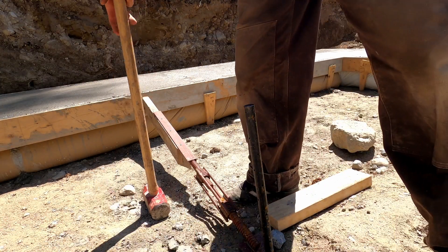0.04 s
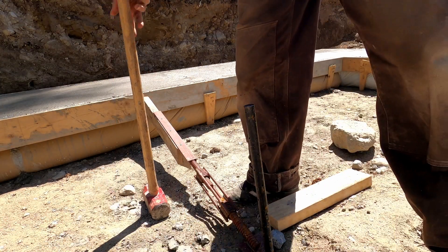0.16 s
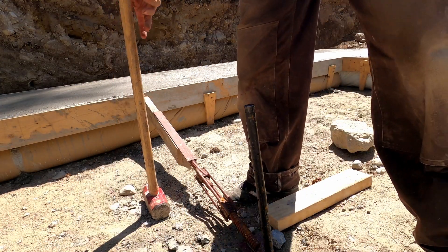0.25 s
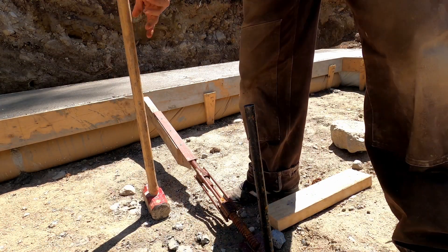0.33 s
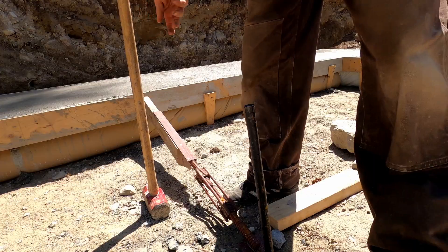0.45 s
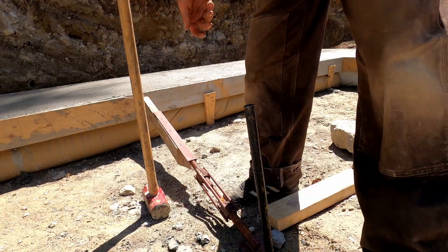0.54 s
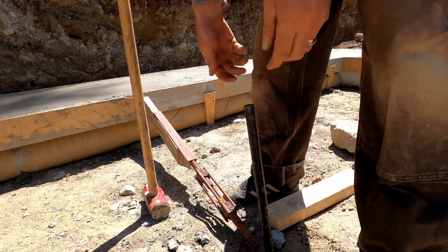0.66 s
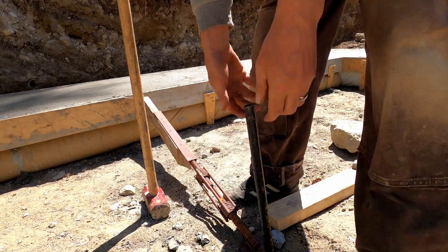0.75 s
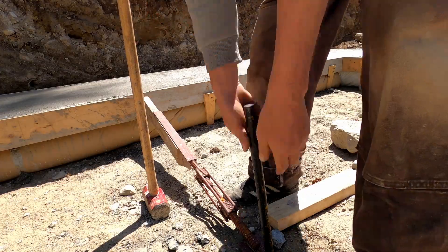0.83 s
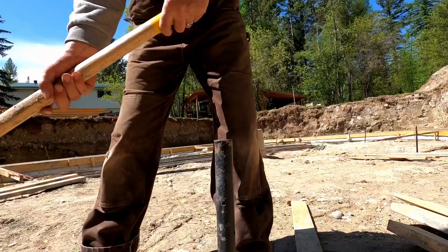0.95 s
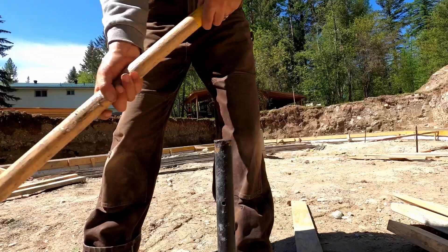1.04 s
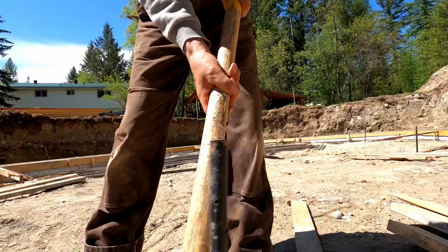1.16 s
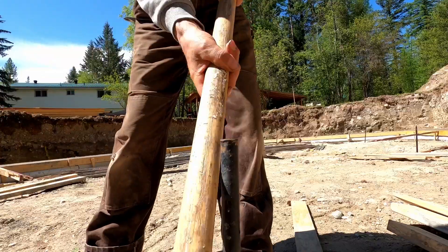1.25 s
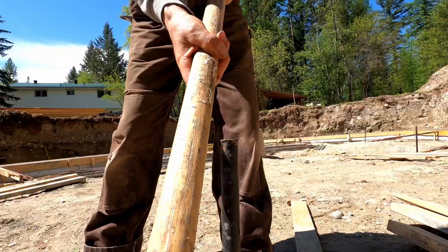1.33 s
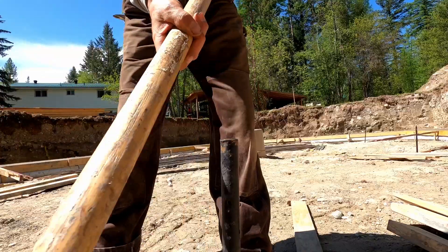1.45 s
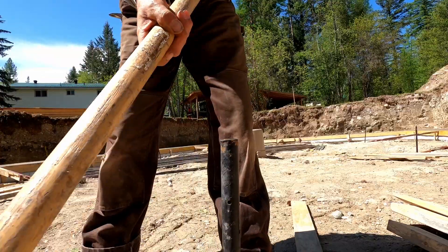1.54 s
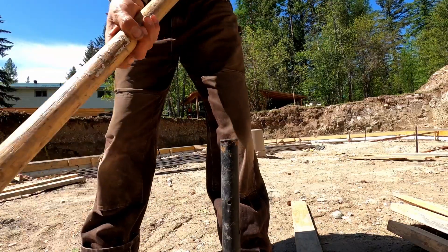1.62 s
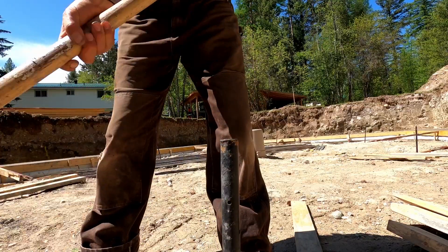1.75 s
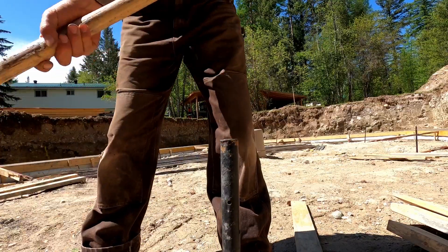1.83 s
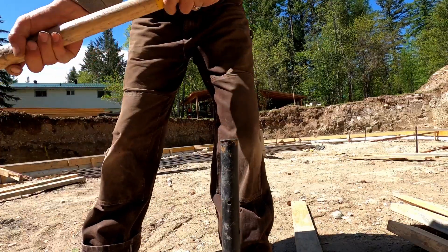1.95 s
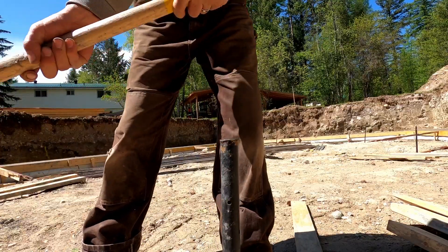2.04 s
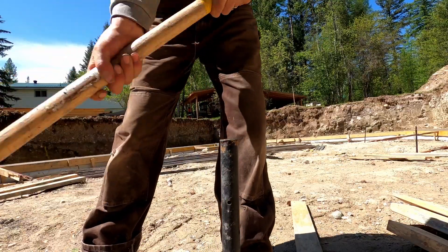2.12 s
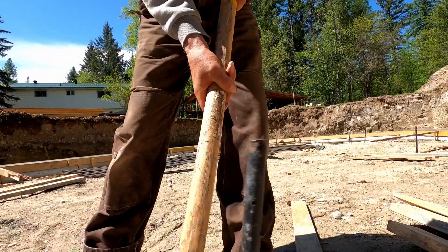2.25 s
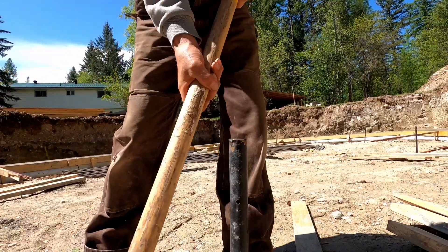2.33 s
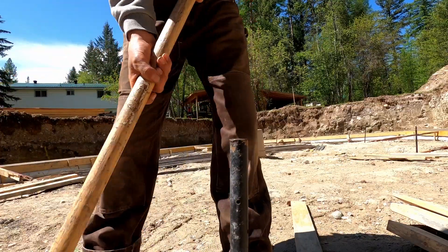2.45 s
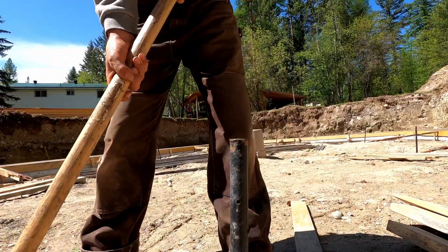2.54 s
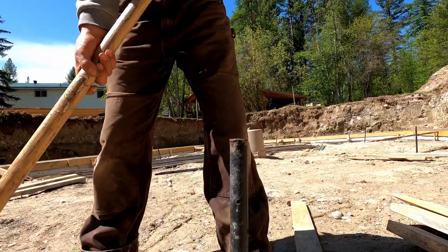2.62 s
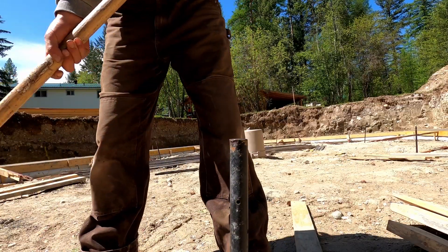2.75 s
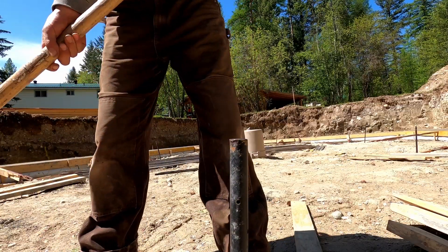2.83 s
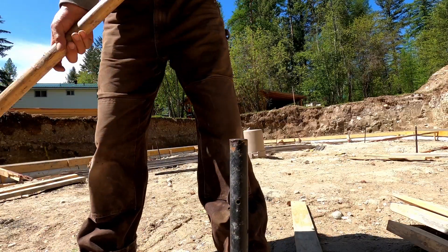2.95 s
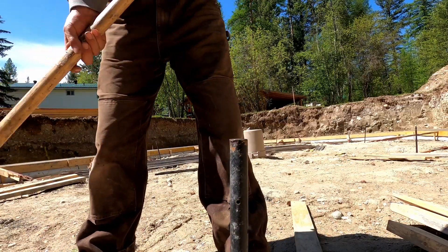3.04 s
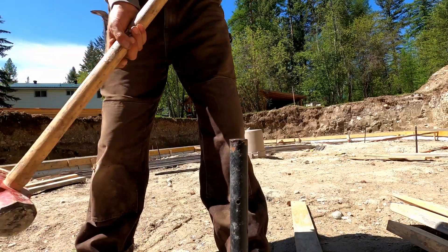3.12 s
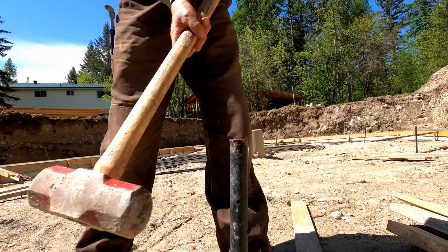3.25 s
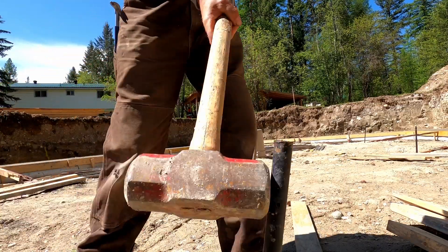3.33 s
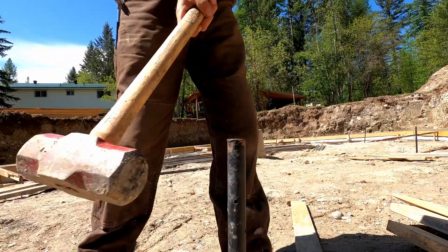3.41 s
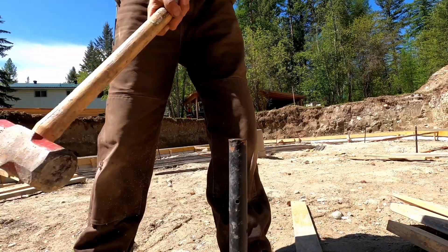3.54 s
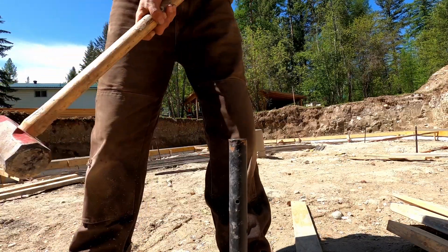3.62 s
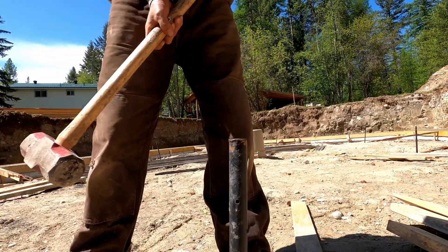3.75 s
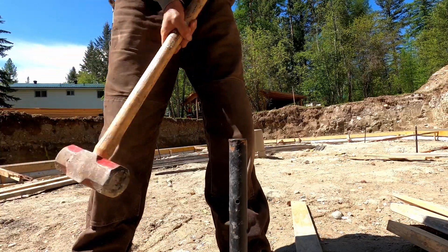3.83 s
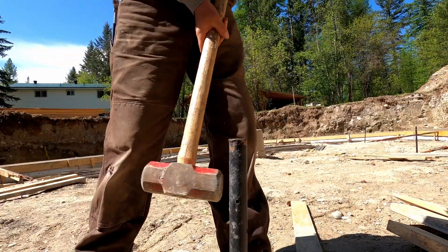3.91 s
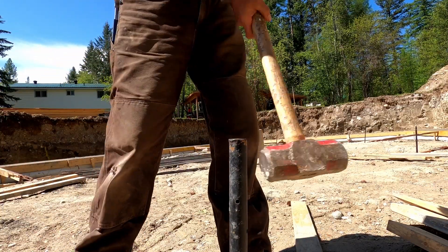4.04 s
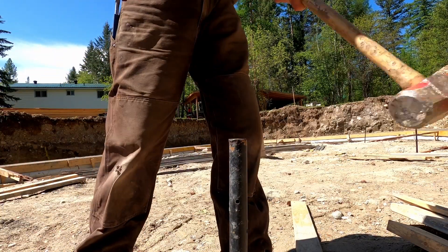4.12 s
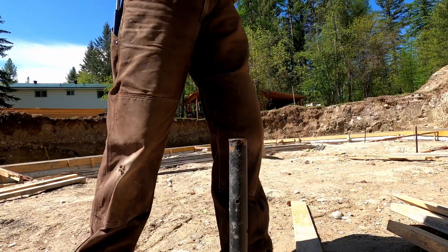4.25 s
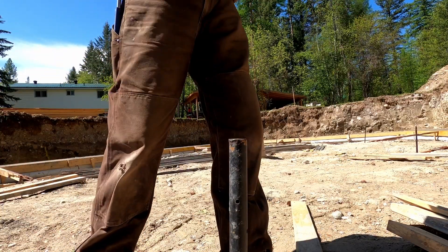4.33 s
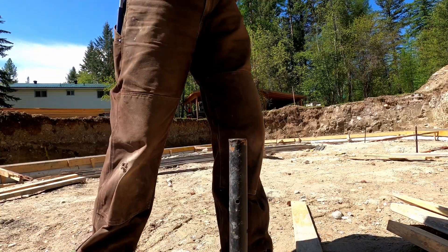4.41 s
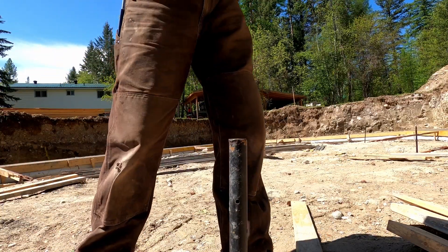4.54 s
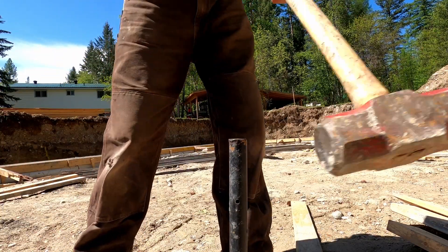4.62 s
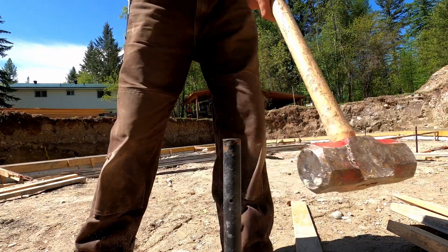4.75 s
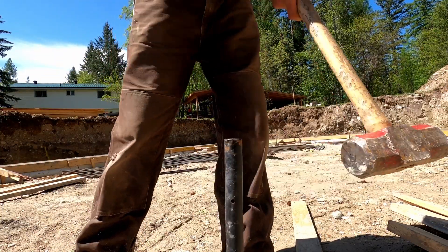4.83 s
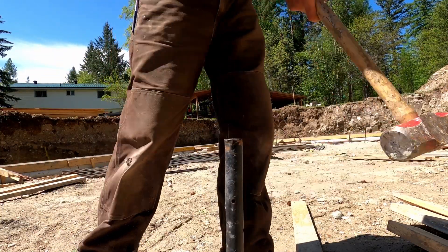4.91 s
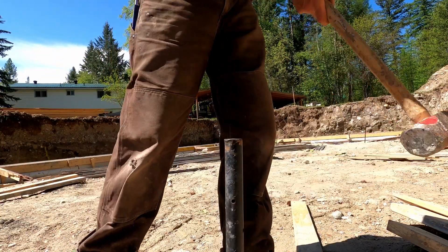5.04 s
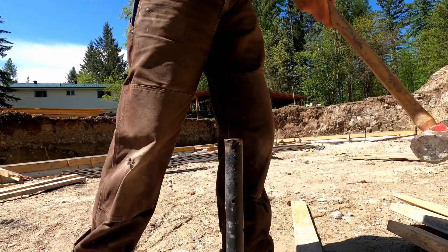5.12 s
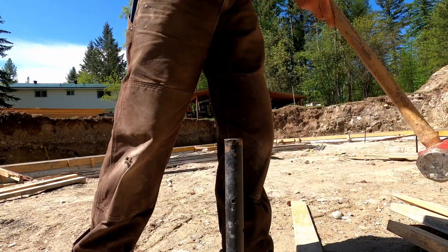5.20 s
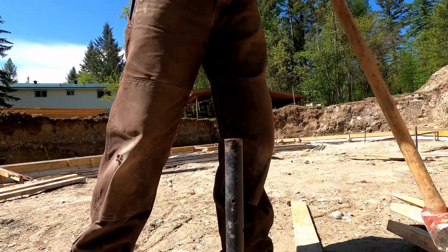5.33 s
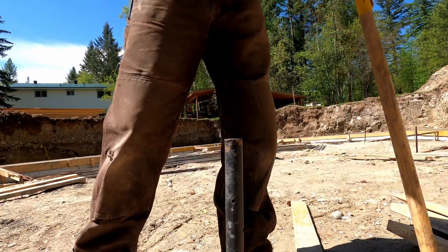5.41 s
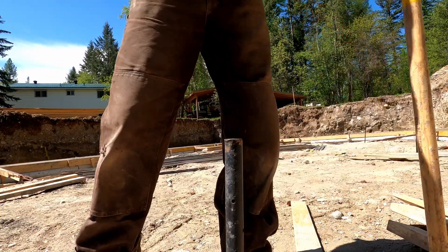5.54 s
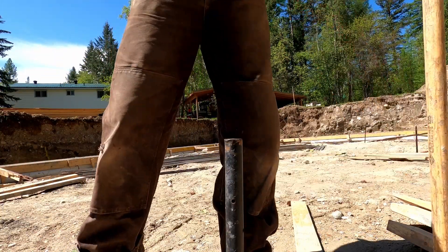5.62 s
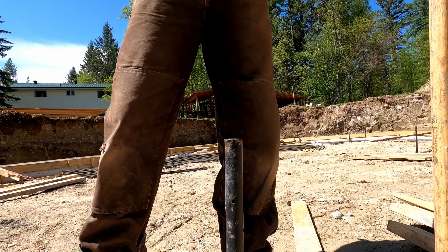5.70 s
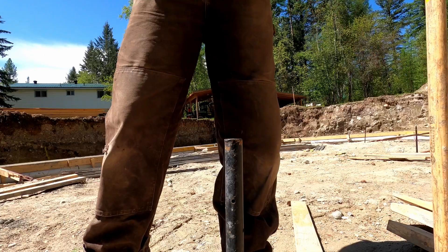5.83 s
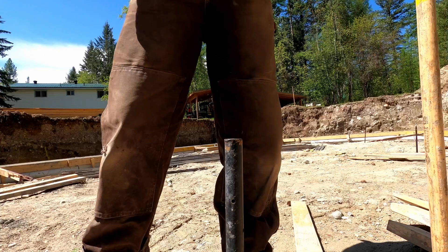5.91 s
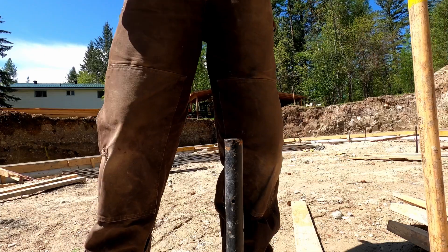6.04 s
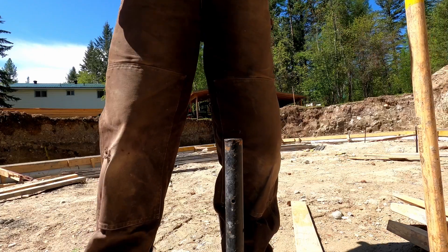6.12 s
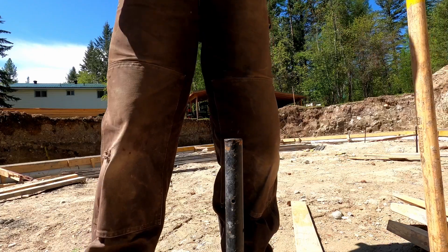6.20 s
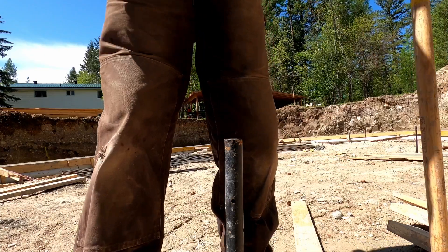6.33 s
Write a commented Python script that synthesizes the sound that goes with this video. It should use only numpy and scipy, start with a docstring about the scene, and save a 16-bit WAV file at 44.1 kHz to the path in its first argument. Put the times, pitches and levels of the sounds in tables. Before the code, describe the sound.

Outdoors at a dirt building site, close microphone, quiet air with low wind rumble. At 0 s a faint pat on dirt, then tiny boot scuffs and sleeve rustles, with a puff of air near 1 s. At 1.24 s a sledgehammer hits a steel pin: a very short rasping swell, a hard bright crack, a brief clang, a thump in the ground around 150 Hz, and quick clanking rebounds. A second blow at 2.34 s is deeper in thump; a third at 3.41 s has longer rattling skips and wooden knocks. Soft rustles and scuffs fill the gaps, and a faint narrow whistling tone comes at 4.47 s. The fourth blow lands at 4.76 s, clattering until about 4.95 s. Each leaves weak steel ringing and a faint diffuse wash from pit and trees. At 5.54 s the head drops with a gritty pat and dull thump, settles, then light scuffing and air until 6.4 s.

```python
"""A faint pat on dirt opens the scene; boots and sleeves scuff and light air stirs at the microphone.
Four close sledgehammer blows then drive a steel pin into packed dirt: noise with narrow wavering tones swells
up before each noise crack; decaying sines ring the steel and thump the ground. Noise clanks rattle as the head
rebounds and a scattered noise wash answers from pit and trees. Soft noise rustles in small catches, and a faint
whistling tone comes before the last blow. At the end the head drops on the dirt: a gritty pat and a thump."""
import sys
import numpy as np
from scipy import signal
from scipy.fft import rfft, irfft, next_fast_len
from scipy.io import wavfile
from scipy.ndimage import map_coordinates

SR = 44100
rng = np.random.default_rng(int(sys.argv[2]) if len(sys.argv) > 2 else 0)


def unload_wav(signal):
    """Save mono or channel-first audio to the path in sys.argv[1] as 16-bit WAV at rate SR, clipped to [-1, 1]."""
    wavfile.write(
        sys.argv[1],
        SR,
        np.round(np.clip(np.atleast_2d(signal).T, -1, 1) * 32767).astype(np.int16),
    )


N = 280917
T = np.arange(SR) / SR  # the one-second time axis of a single sound, s
TOP_HZ = 15700  # band limit

# Event levels are in dB ahead of the fixed trims in the functions; spectra and mode levels are relative.

# Full blows. Each row: start in seconds, crack in dB, rasp in dB, rasp tilt in dB per octave,
# extra rasp tone in Hz, thump in dB, thump pitch in Hz, pin ring in dB, head ring in dB, chatter in dB.
BLOWS = [(1.2392, -4.5, -18.5, -0.5, 5536, -16, 150.3, -53, -70, -52.5),
         (2.3444, -4.5, -16.5, -2.25, 5764, -13, 116.2, -63, -72, -42.5),
         (3.4088, -7.5, -17, 1.95, 6672, -17, 156.8, -62.5, -56, -36),
         (4.7598, -6.5, -18, 1.83, 9400, -14.5, 152.5, -52.5, -49, -42)]
# The head comes down on the pin again. Each row: start in seconds, clank in dB, clank pitch in Hz, knock in dB.
REBOUNDS = [(1.2542, -15.5, 3123, -34.5), (1.2779, -29, 3085, -43.5), (1.3049, -17.5, 1845, -25),
            (2.3537, -21, 3000, -36.5), (2.368, -25, 2700, -36.5), (2.382, -22.5, 4000, -32.5),
            (2.4243, -31.5, 3010, -32.5), (2.463, -40.5, 3050, -42), (3.411, -17, 2644, -30.5),
            (3.43, -33, 2195, -31), (3.458, -29, 4100, -34.5), (3.476, -32, 3350, -29.5),
            (3.493, -38, 1992, -34.5), (3.53, -33.5, 2500, -32.5), (3.612, -52, 1991, -46.5),
            (4.768, -31, 3007, -25.5), (4.816, -35.5, 2189, -24), (4.8248, -17.5, 3552, -33),
            (4.879, -29, 3850, -26), (4.9044, -28.5, 3110, -36), (4.931, -55.5, 1900, -40.5)]
# The head lands on dirt. Each row: start in seconds, grit in dB, thump in dB, thump pitch in Hz.
DROPS = [(0.0, -52.5, -51, 104.6), (5.538, -20, -17, 134.9), (5.596, -46.5, -31.5, 137.6),
         (5.657, -60.5, -55, 137.2)]
# Boots, hands and sleeves scuff. Each row: start in seconds, level in dB, low knock in dB, length in seconds.
SCUFFS = [(0.325, -69.5, -64, 0.051), (0.502, -69.5, -62, 0.17), (0.592, -73, -55, 0.05),
          (0.634, -79, -59, 0.067), (0.69, -55.5, -68, 0.014), (0.909, -52.5, -59, .08),
          (1.135, -46, -72.5, 0.02), (1.167, -53, -68.5, .02), (1.695, -61.5, -72, .06),
          (2.098, -53.5, -72.5, 0.033), (2.836, -66.5, -73.5, 0.033), (2.962, -64, -95, 0.035),
          (3.038, -58, -79, 0.31), (4.078, -58.5, -64, .04), (4.105, -71.5, -59, .1),
          (4.626, -60, -64.5, 0.13), (5.12, -60.5, -61, 0.11), (6.063, -60.5, -66, 0.34)]
# Soft rustling swells. Each row: peak in seconds, level in dB, rise in seconds, fall in seconds.
RUSTLES = [(.58, -67.5, 0.055, .3), (.97, -59, .06, 0.18), (3.2, -75.5, .25, 0.16), (4.08, -64, .2, 0.18),
           (4.29, -61.5, .11, 0.13), (5.1, -70, .2, 0.16), (5.52, -63.5, 0.095, 0.084),
           (6.2, -72.5, .13, 0.15)]
# Puffs of air at the microphone. Each row: peak in seconds, level in dB, rise in seconds, fall in seconds.
PUFFS = [(1.02, -60.5, .3, 0.28), (2.12, -60, .15, 0.34), (6.1, -60.5, .45, 0.39)]

# Steel modes of the pin. Each row: pitch in Hz, level in dB, 60 dB decay in seconds.
PIN_MODES = [(1884, 5, 1.1), (3058, -11, .6), (4000, -12, .7), (4802, 8, .3), (5053, 11, 0.44),
             (6573, -9, .5), (8969, -3, .42)]
# Steel modes of the hammer head. Each row: pitch in Hz, level in dB, 60 dB decay in seconds.
HEAD_MODES = [(3350, -4.5, .35), (4340, 0, 0.2), (6640, -5.5, .45), (9100, -5, 0.38), (13330, 6, .23)]
# The brief clang while head and pin touch. Each row: pitch in Hz, level in dB, 60 dB decay in seconds.
CLANG_MODES = [(1905, -6.5, .04), (2200, -5.5, 0.06), (2716, -8.5, 0.017), (2970, 0, 0.055),
               (3240, -4.5, 0.082), (3410, -3.5, 0.03), (3800, -7, .04), (5000, -9.5, .06),
               (6520, -15, 0.066), (9200, -20.5, 0.075)]
# Low modes of the ground. Each row: multiple of the thump pitch, level in dB, 60 dB decay in seconds.
GROUND_MODES = [(.5, -11, .4), (1.001, 3, 0.3), (1.27, -14.5, 0.52), (1.9, -20.5, 0.26), (3.05, -16, 0.18)]
# Narrow wavering tones in the rasp. Each row: pitch in Hz, width in Hz, level in dB.
RASP_TONES = [(767, 19, -14), (3300, 10, -6.5), (3715, 38, -5.5), (4060, 45, 0.5), (4340, 90, -5.5),
              (5540, 11, -2.5), (6600, 30, -6.5), (6960, 40, -9), (9320, 13, -7)]
# Narrow colours in the rasp noise. Each row: centre in Hz, width in Hz, lift in dB.
RASP_PEAKS = [(435, 35, 13.5), (687, 15, 10.5), (767, 27, 9), (9300, 400, 3.5)]

# Noise colours of the blow's rasp and crack. Each row: frequency in Hz, density in dB per Hz.
RASP_COLOUR = [(60, -4.5), (200, -3), (550, -11), (1200, -3.5), (2000, -0.5), (4000, 2), (7000, -4),
               (8000, -18), (9800, -8.5), (11800, -28), (15000, -28.5)]
CRACK_COLOUR = [(100, -13), (700, -16.5), (1500, -25), (2100, -0.5), (3100, 2.5), (4200, -3.5), (6000, -6),
                (9000, -16.5), (12000, -33.5), (15500, -27)]
# Noise colours of a rebound's clank and handle knock. Each row: frequency in Hz, density in dB per Hz.
CLANK_COLOUR = [(300, -16), (1400, -8.5), (2200, 2.5), (3200, 1), (4300, -5.5), (6500, -17), (8500, -28),
                (11000, -42), (15000, -58.5)]
KNOCK_COLOUR = [(60, -6.5), (300, 3), (600, -0.5), (850, -1.5), (1150, 2.5), (1700, -8), (3000, -17.5),
                (6000, -37.5), (12000, -75)]
# Noise colours of loose soil, grit under the head and scrapes. Each row: frequency in Hz, density in dB per Hz.
SOIL_COLOUR = [(15, -14.5), (30, -8.5), (70, 1), (170, 1), (260, -12), (450, -18), (900, -35.5),
               (3000, -69.5)]
GRIT_COLOUR = [(100, -14), (400, 8), (1200, -2.5), (2500, -5.5), (4000, -14.5), (7500, -18), (9500, -13.5),
               (13000, -28), (16000, -49)]
SCRAPE_COLOUR = [(300, -13), (1300, -4), (2500, 4.5), (6000, -4.5), (10000, -15.5), (15000, -26.5)]
# Dirt stirred by a dropped head. Each row: frequency in Hz, density in dB per Hz.
DIRT_COLOUR = [(30, -25.5), (70, -0.5), (120, 3.5), (220, -4), (330, -18.0), (600, -42), (2000, -68.5)]
# Noise colours of the rustle, outdoor air and air rumble. Each row: frequency in Hz, density in dB per Hz.
RUSTLE_COLOUR = [(180, -35.5), (300, -0.5), (452, 2.5), (703, -5.5), (828, -6.5), (1130, -3), (1310, 0.5),
                 (4320, -6.5), (9800, -23), (12900, -32), (15000, -38.5)]
AIR_COLOUR = [(12, -29.5), (20, 2.5), (38, -8), (61, -13), (139, -16), (223, -21), (256, -29), (286, -21.5),
              (367, -28), (733, -36.5), (1020, -31.5), (1390, -32), (1930, -32.5), (6360, -39),
              (15000, -62.5)]
RUMBLE_COLOUR = [(15, -10), (36, 1.5), (60, -8.5), (100, -4.5), (135, -20.5), (300, -29), (1000, -58.5),
                 (8000, -100)]

# Colour of the wash from pit and trees. Each row: frequency in Hz, density in dB per Hz.
ECHO_COLOUR = [(100, -15.5), (500, -12.5), (1000, -3.5), (2000, 2.5), (3000, -1.5), (4500, 3), (6800, 0),
               (9500, -2.5), (14000, -14)]
# Fade of the wash. Each row: frequency in Hz, 60 dB decay in seconds.
ECHO_T60 = [(200, 0.65), (1500, 0.81), (4000, 0.68), (7000, 0.52), (12000, .45)]
# Stereo width. Each row: time in seconds, side against mid in dB.
WIDTH = [(0, -13), (2.1, -14), (2.161, -39), (6.37, -42)]
# Width of the highest treble. Each row: frequency in Hz, side against mid in dB.
SPARKLE = [(5000, -60), (9800, -30.0), (12500, -1.5)]

# Air: calm rumble between puffs, and the draught stirred by every blow
RUMBLE_DB = -72.5
DRAUGHT_DB, DRAUGHT_RISE_S, DRAUGHT_FALL_S = -63, 0.054, .25
# Wash: build-up, and how far it blurs the pitch of what it returns
ECHO_RISE_S, ECHO_BLUR_HZ = .08, 502
# Rustle: the swell that goes with every blow; rate of grit ticks and their level against the rustle
SWING_DB, SWING_RISE_S, SWING_FALL_S = -66, .07, 0.16
TICKS_PER_S, TICK_DB = 90, -15.5
# The faint whistling tone: peak time, centre, half-width, level, spread
WHISTLE_S, WHISTLE_HZ, WHISTLE_WIDTH_HZ, WHISTLE_DB, WHISTLE_SPREAD_S = 4.47, 1646, 48, -63.5, 0.047
# Chatter after a blow: delay to the first skip, gap scale, factor on the gap for each skip
CHATTER_START_S, CHATTER_GAP_S, CHATTER_SHRINK = .095, .04, .8
# Chatter: loss each skip, clank pitch, clank against knock
CHATTER_LOSS_DB, CHATTER_HZ, CHATTER_CLANK_DB = 6, 2000, -8.5
# Lower clanks are duller: dB per octave for each octave of pitch, pitch with no tilt
CLANK_TILT_DB, CLANK_MID_HZ = 6, 3200
# A rebound's push on the ground: level for a 0 dB knock, dB per dB of knock
PUSH_DB, PUSH_FOLLOWS = -18.5, 0.54
# Each rasp has one more strong tone: width, level
EXTRA_TONE_WIDTH_HZ, EXTRA_TONE_DB = 61, 3.5
# The deeper the pin sits, the more the soil holds its lowest mode: loss with each blow
GRIP_DB = 6.5


def amp(db):
    """Decibels to gain."""
    return 10 ** (np.asarray(db) / 20)


def unit(x):
    """Scale to rms 1."""
    return x / np.sqrt(np.mean(x ** 2) + 1e-20)


def along(points, hz):
    """Read (Hz, value) points on a log frequency axis."""
    f, value = np.transpose(points)
    return np.interp(np.log(hz + 1), np.log(f + 1), value)


def filtered(x, gain):
    """Apply a gain that depends on frequency."""
    n = x.shape[-1]
    padded = next_fast_len(n + 8192)
    return irfft(rfft(x, padded) * gain(np.fft.rfftfreq(padded, 1 / SR)), padded)[..., :n]


def noise(spectrum, size=SR, tilt_db=0, peaks=(), ripple_db=0):
    """Noise of rms 1 with a spectrum, a tilt per octave, narrow peaks and random resonant ripple."""
    knots = rng.standard_normal(400)

    def gain(f):
        lift = sum(db / (1 + (2 * (f - hz) / width) ** 2) for hz, width, db in peaks)
        ripple = ripple_db * map_coordinates(knots, [np.sqrt(f) * .7], mode="mirror")
        return amp(along(spectrum, f) + tilt_db * np.log2(f + 1) + lift + ripple)

    return unit(filtered(rng.standard_normal(size), gain))


def hit_envelope(t60, attack):
    """A quick exponential rise and a fall of 60 dB in t60 seconds."""
    return amp(-60 * T / t60) * (1 - np.exp(-T / attack))


def burst(spectrum, t60, attack, ripple_db=0):
    """A contact: coloured noise that rises quickly and dies away."""
    return noise(spectrum, ripple_db=ripple_db) * hit_envelope(t60, attack)


def ring(modes, scatter_db, bloom=0):
    """Steel modes at new strengths for each blow; with bloom the long-lived ones build up slowly."""
    total = np.zeros(SR)
    for hz, db, t60 in modes:
        tone = np.sin(2 * np.pi * (hz * T + rng.random()))
        strength = amp(db + scatter_db * rng.normal())
        total += strength * tone * hit_envelope(t60, attack=bloom * t60 ** 2 + 1e-4)
    return total


def add(track, s, sound):
    """Mix a sound into the track at time s."""
    i = max(0, round(s * SR))
    track[i:i + len(sound)] += sound[:N - i]


def swell(s, rise, fall):
    """A smooth bell of gain that peaks at time s."""
    t = np.arange(N) / SR - s
    return np.exp(-(t / np.where(t < 0, rise, fall)) ** 2 / 2)


def effort(events):
    """The joint gain, summed in power, of swells given as (s, dB, rise s, fall s)."""
    return np.sqrt(sum((amp(db) * swell(s, rise, fall)) ** 2 for s, db, rise, fall in events))


def surroundings():
    """Quiet outdoor air, and a low rumble that swells with puffs of wind and the draught of each blow."""
    draughts = [(s, DRAUGHT_DB, DRAUGHT_RISE_S, DRAUGHT_FALL_S) for s, *_ in BLOWS]
    rumble = np.hypot(amp(RUMBLE_DB), effort(PUFFS + draughts)) * noise(RUMBLE_COLOUR, size=N)
    return rumble + amp(-69.5) * noise(AIR_COLOUR, size=N)


def echo(x):
    """Pit walls and trees scatter a blurred wash that builds up, then falls away, highest treble fastest."""
    hz, t, bins = signal.stft(noise(ECHO_COLOUR, ripple_db=3.5), SR, nperseg=256)
    fade_db = -60 * (t / along(ECHO_T60, hz)[:, None]) ** 1.3
    build_up = 1 - np.exp(-t / ECHO_RISE_S)
    tail = signal.istft(bins * amp(fade_db) * build_up, SR, nperseg=256)[1]
    # multiplying by slow noise smears the pitch
    blur = unit(filtered(rng.standard_normal(N), lambda f: np.exp(-(f / ECHO_BLUR_HZ) ** 2)))
    return signal.fftconvolve(x * blur, tail / np.linalg.norm(tail))[:N]


def rustling():
    """Soft noise swells, also with every blow, roughened by small random catches and sprinkled with grit ticks."""
    t = np.arange(N) / SR

    def wobble(rate_hz):
        return map_coordinates(rng.standard_normal(N // 50), [t * rate_hz])

    catches = amp(1.0 * wobble(30) + 1.3 * wobble(350))
    rustle = unit(catches * noise(RUSTLE_COLOUR, size=N, ripple_db=1.0))
    grains = (rng.random(N) < TICKS_PER_S / SR) * rng.standard_normal(N)
    tick = burst(SCRAPE_COLOUR, t60=.008, attack=.0002)
    ticks = unit(signal.fftconvolve(grains, tick)[:N])
    swings = [(s, SWING_DB, SWING_RISE_S, SWING_FALL_S) for s, *_ in BLOWS]
    return effort(RUSTLES + swings) * (rustle + amp(TICK_DB) * ticks)


def whistling_tone():
    """A faint, narrow whistling tone: noise through one narrow resonance, swelling and fading once."""
    resonance = lambda hz: 1 / (1 + ((hz - WHISTLE_HZ) / WHISTLE_WIDTH_HZ) ** 2)
    tone = unit(filtered(rng.standard_normal(N), resonance))
    return amp(WHISTLE_DB) * swell(WHISTLE_S, WHISTLE_SPREAD_S, WHISTLE_SPREAD_S) * tone


def scuffs():
    """Small scrapes of boots on grit and hands on the handle; longer ones start more softly."""
    out = np.zeros(N)
    for s, db, knock_db, length in SCUFFS:
        add(out, s, amp(db + 2.0) * burst(SCRAPE_COLOUR, length, attack=length * .05))
        add(out, s, amp(knock_db + 5.5) * burst(KNOCK_COLOUR, length, attack=length * 0.039))
    return out


def drops():
    """The head falls on dirt and settles: a gritty pat and a dull thump."""
    out = np.zeros(N)
    for s, grit_db, thump_db, pitch_hz in DROPS:
        pat = burst(GRIT_COLOUR, t60=0.042, attack=.001)
        trickle = burst(GRIT_COLOUR, t60=0.19, attack=.002)
        add(out, s, amp(grit_db) * (pat + amp(-22.5) * trickle))
        # the soil gives way once under the weight, then bounces
        u = (T - .01) / 0.0022
        push = (2 * u ** 2 - 1) * np.exp(-u ** 2)
        bounce = np.sin(2 * np.pi * pitch_hz * T) * hit_envelope(t60=0.312, attack=0.012)
        dirt = burst(DIRT_COLOUR, t60=0.37, attack=0.0018)
        add(out, s, amp(thump_db) * (amp(11) * push + amp(3) * bounce + amp(-8.0) * dirt))
    return out


def thump(pitch_hz, attack, soil_db):
    """The ground bounces in a few low modes over a rumble of loose soil."""
    bounce = sum(amp(db - 60 * T / t60) * np.sin(2 * np.pi * multiple * pitch_hz * T)
                 for multiple, db, t60 in GROUND_MODES)
    soil = burst(SOIL_COLOUR, t60=0.33, attack=0.0011)
    return bounce * (1 - np.exp(-T / attack)) + amp(soil_db) * soil


def chatter(count):
    """After each blow the head settles in weaker, on average quicker, skips: rows like those of the rebounds."""
    k = np.arange(count)
    skips = []
    for s, *_, chatter_db in BLOWS:
        gaps = CHATTER_GAP_S * CHATTER_SHRINK ** k * rng.uniform(.7, 1.3, count)
        times = s + CHATTER_START_S + np.cumsum(gaps) - gaps[0]
        knocks_db = chatter_db - CHATTER_LOSS_DB * k
        skips += [(t, db + CHATTER_CLANK_DB, CHATTER_HZ, db) for t, db in zip(times, knocks_db)]
    return skips


def rebounds():
    """The head skips on the pin: a pitched steel clank, a knock in the wooden handle, a small ground push."""
    out = np.zeros(N)
    for s, clank_db, pitch_hz, knock_db in REBOUNDS + chatter(count=4):
        tilt_db = CLANK_TILT_DB * np.log2(pitch_hz / CLANK_MID_HZ)
        steel = noise(CLANK_COLOUR, tilt_db=tilt_db, peaks=[(pitch_hz, 700, 9)], ripple_db=2)
        add(out, s, amp(clank_db + 0.5) * steel * hit_envelope(t60=0.022, attack=.0003))
        add(out, s, amp(knock_db + 3) * burst(KNOCK_COLOUR, t60=0.058, attack=0.0035, ripple_db=3.5))
        push_db = PUSH_DB + PUSH_FOLLOWS * knock_db
        add(out, s, amp(push_db) * thump(170, attack=0.0053, soil_db=-3))
    return out


def rasp(tone_rows, tilt_db, lead, rise_db, fall_t60, tones_db):
    """A bright noisy rasp with narrow wavering tones swells for lead seconds, then falls away."""
    rise = amp(-rise_db * np.clip(1 - T / lead, 0, 1) ** 1.7)
    after = np.clip(T - lead, 0, None)
    tones = np.zeros(SR)
    for hz, width, db in tone_rows:
        # a random walk in phase spreads the tone to its width
        drift = np.cumsum(rng.standard_normal(SR)) * np.sqrt(2 * np.pi * width / SR)
        tones += amp(db) * np.sin(2 * np.pi * (hz * T + rng.random()) + drift)
    hiss = noise(RASP_COLOUR, tilt_db=tilt_db, peaks=RASP_PEAKS, ripple_db=7.0)
    falling_hiss = hiss * amp(-60 * after / fall_t60)
    falling_tones = unit(tones) * amp(tones_db - 60 * after / .035)
    return rise * (falling_hiss + falling_tones)


def blows():
    """A noisy rasp swells up, then steel cracks and clangs, pin and head ring on, the pin shoves the ground."""
    cracks, rest = np.zeros(N), np.zeros(N)
    lead = .046  # s of rasp before the crack
    for depth, row in enumerate(BLOWS):
        s, crack_db, rasp_db, tilt_db, extra_hz, thump_db, pitch_hz, pin_db, head_db, _ = row
        tone_rows = RASP_TONES + [(extra_hz, EXTRA_TONE_WIDTH_HZ, EXTRA_TONE_DB)]
        swelling = rasp(tone_rows, tilt_db, lead, rise_db=53.5, fall_t60=0.079, tones_db=0.5)
        add(cracks, s - lead, amp(rasp_db) * swelling)
        crack = burst(CRACK_COLOUR, t60=0.015, attack=0.00037, ripple_db=2)
        clang = ring(CLANG_MODES, scatter_db=-0.5)
        add(cracks, s, amp(crack_db) * (amp(5.5) * crack + amp(-9.5) * clang))
        # the soil's hold weakens towards the higher modes
        lowest_hz = PIN_MODES[0][0]
        gripped_pin = [(hz, db - depth * GRIP_DB * (lowest_hz / hz) ** 2, t60) for hz, db, t60 in PIN_MODES]
        add(rest, s, amp(pin_db) * ring(gripped_pin, scatter_db=1, bloom=.13))
        add(rest, s, amp(head_db) * ring(HEAD_MODES, scatter_db=1))
        add(rest, s, amp(thump_db - 2.5) * thump(pitch_hz, attack=0.0063, soil_db=2))
    return cracks, rest


def scene():
    """Everything sits straight ahead; the image starts a little wide, then narrows below the highest treble."""
    cracks, rest = blows()
    hits = cracks + rebounds()
    background = surroundings() + amp(-35) * echo(hits) + rustling() + whistling_tone()
    mid = background + scuffs() + drops() + hits + rest
    width = amp(np.interp(np.arange(N) / SR, *np.transpose(WIDTH)))
    # both side parts are the mid turned a quarter cycle, in opposite directions
    sparkle = filtered(mid, lambda hz: 1j * amp(along(SPARKLE, hz)))
    side = width * filtered(mid, lambda hz: -1j * (hz > 0)) + sparkle
    return np.array([mid + side, mid - side])


def record(dry):
    """Peaks saturate smoothly towards full scale; nothing is kept above the band limit."""
    saturated = dry / (1 + np.abs(dry) ** 6) ** (1 / 6)
    return filtered(saturated, lambda hz: hz < TOP_HZ)


dry = scene()
out = record(dry)
unload_wav(out)
```